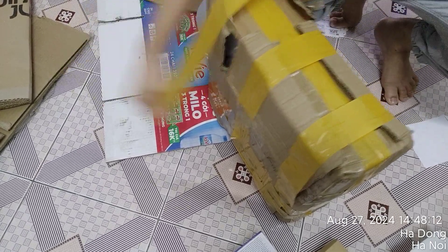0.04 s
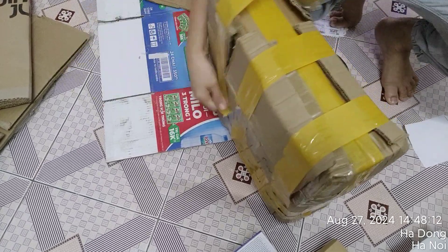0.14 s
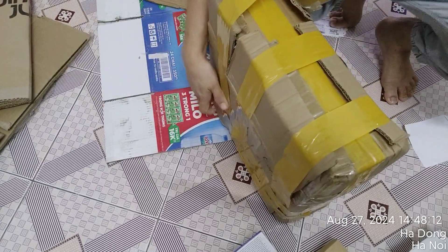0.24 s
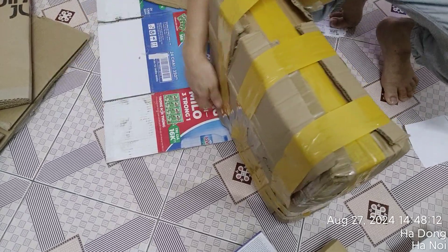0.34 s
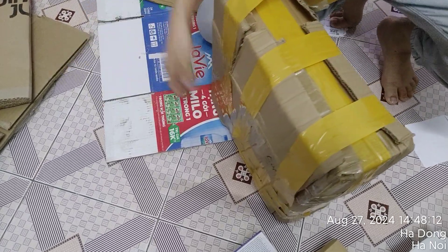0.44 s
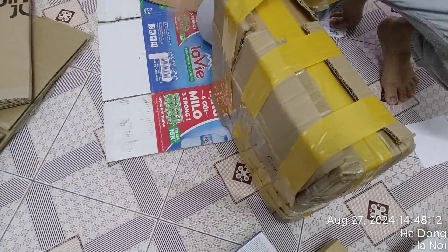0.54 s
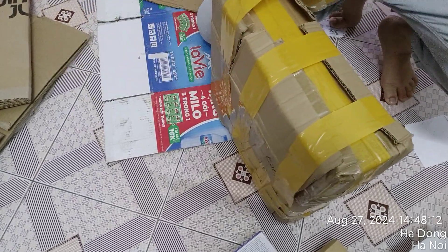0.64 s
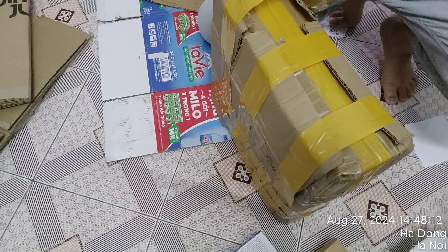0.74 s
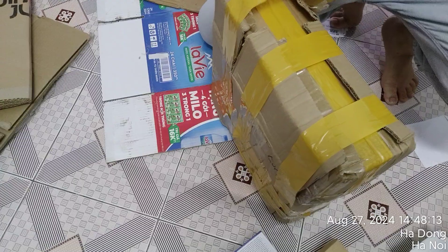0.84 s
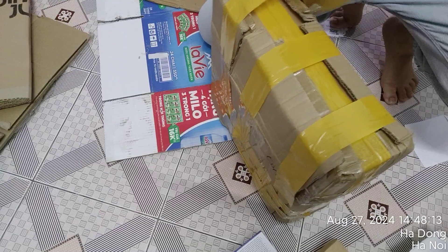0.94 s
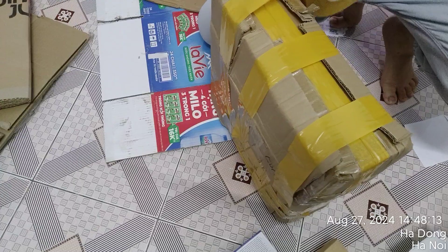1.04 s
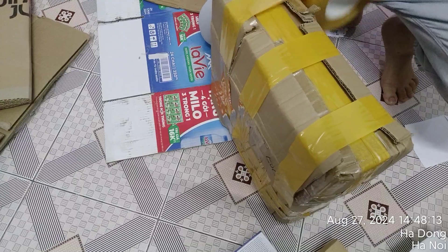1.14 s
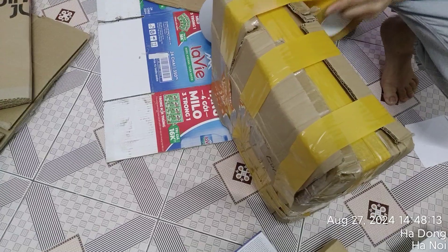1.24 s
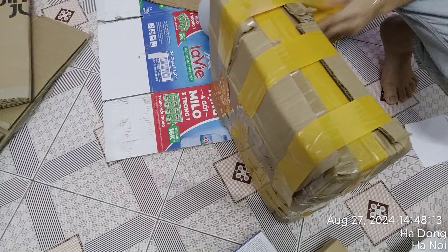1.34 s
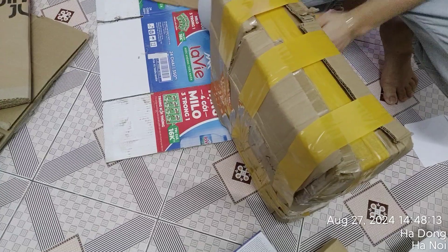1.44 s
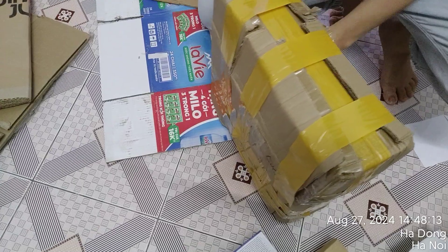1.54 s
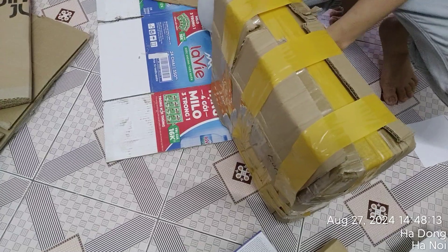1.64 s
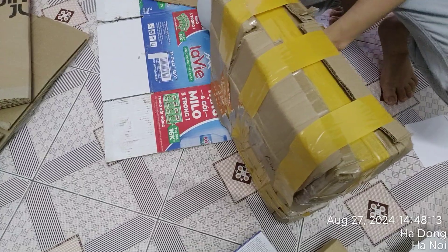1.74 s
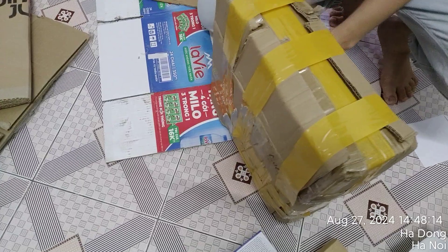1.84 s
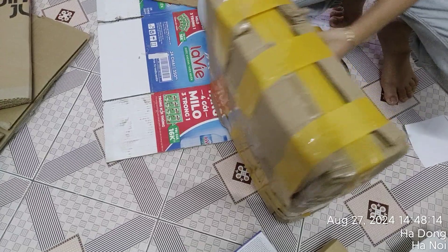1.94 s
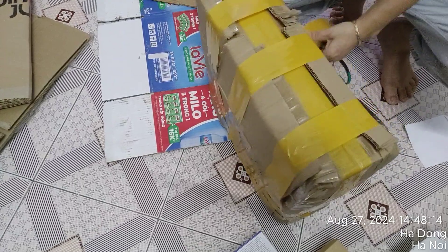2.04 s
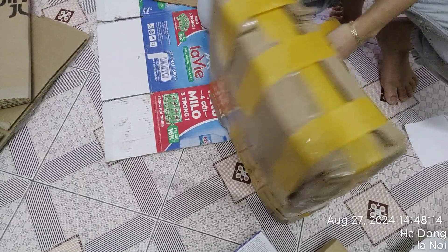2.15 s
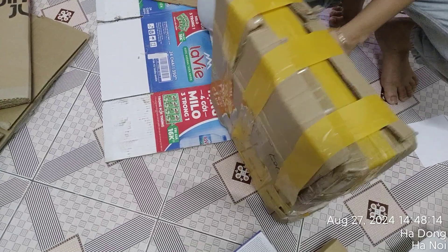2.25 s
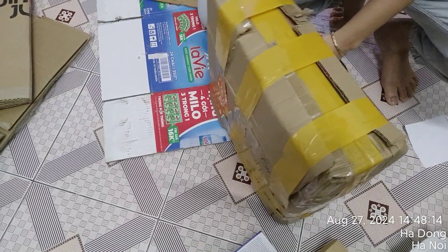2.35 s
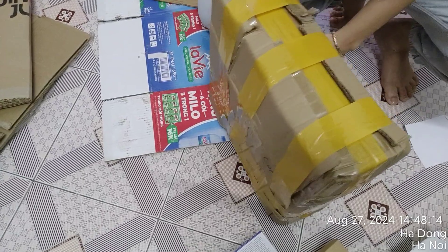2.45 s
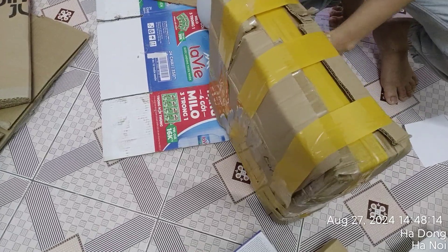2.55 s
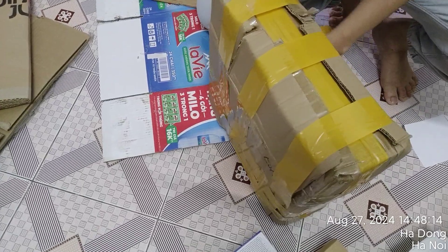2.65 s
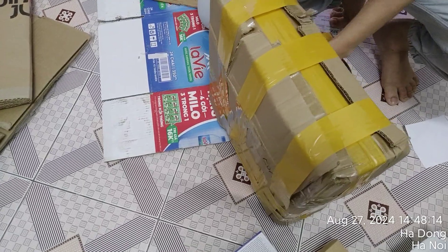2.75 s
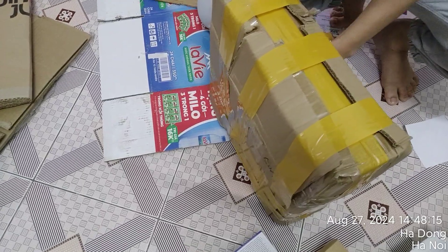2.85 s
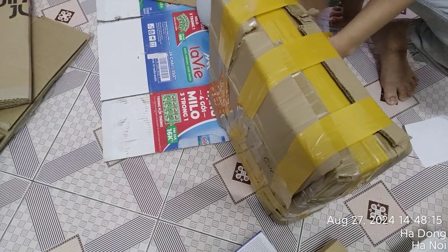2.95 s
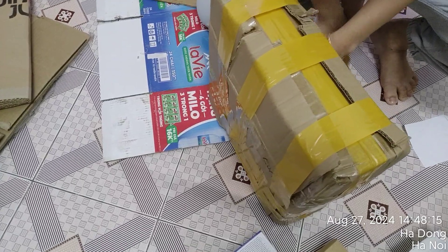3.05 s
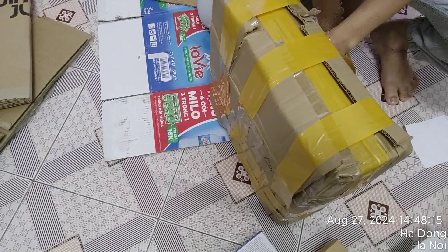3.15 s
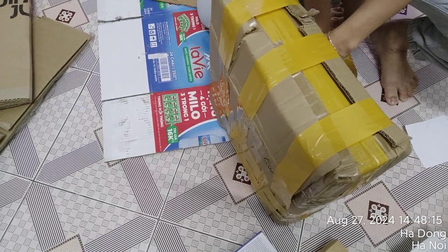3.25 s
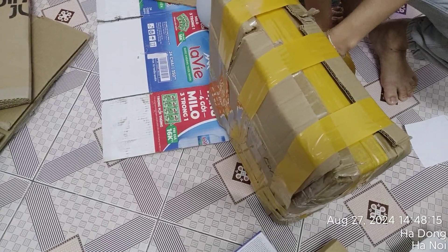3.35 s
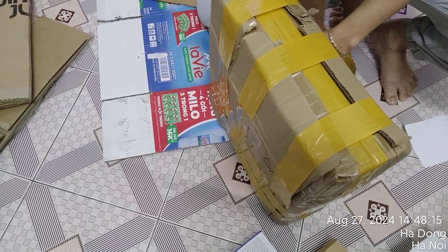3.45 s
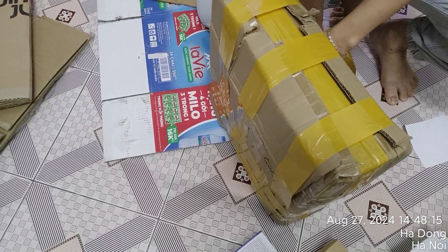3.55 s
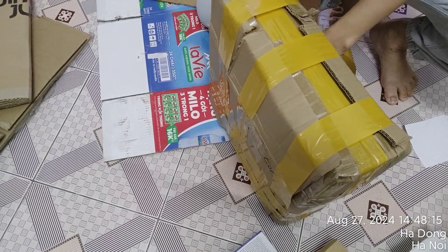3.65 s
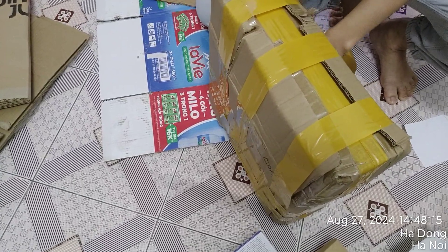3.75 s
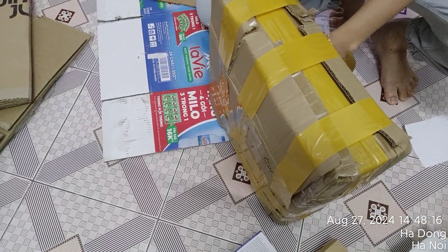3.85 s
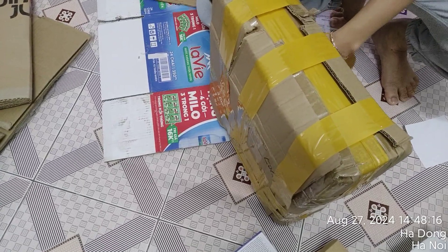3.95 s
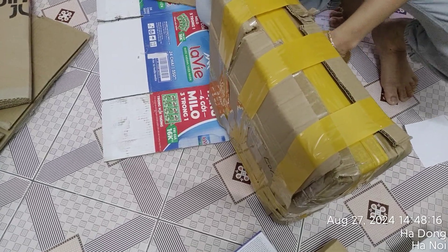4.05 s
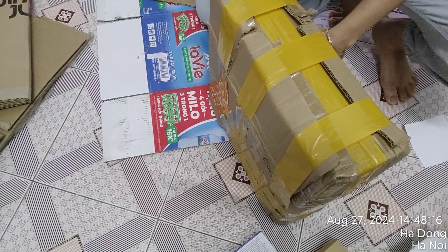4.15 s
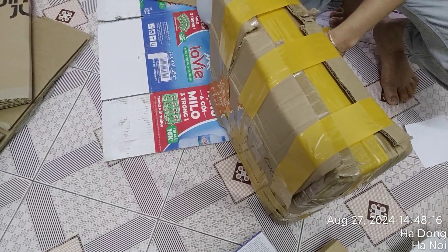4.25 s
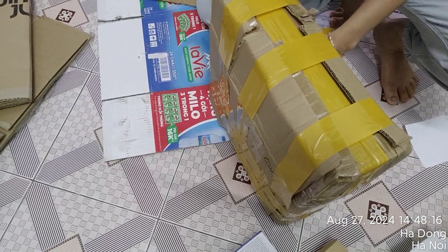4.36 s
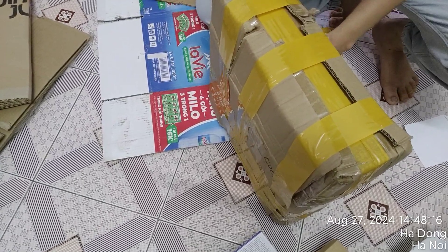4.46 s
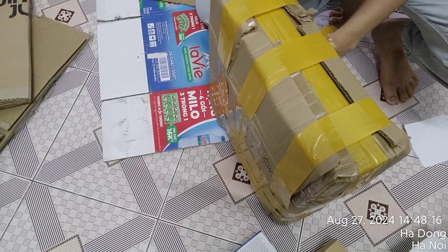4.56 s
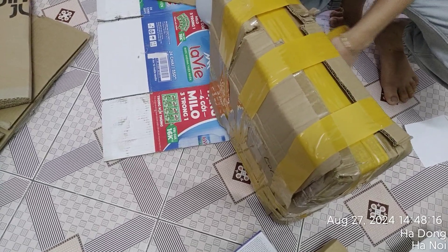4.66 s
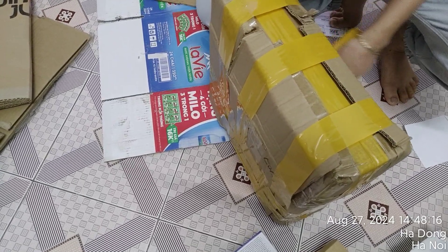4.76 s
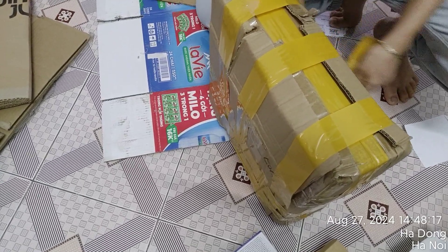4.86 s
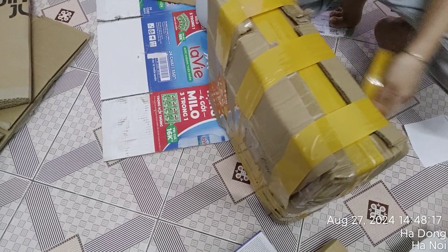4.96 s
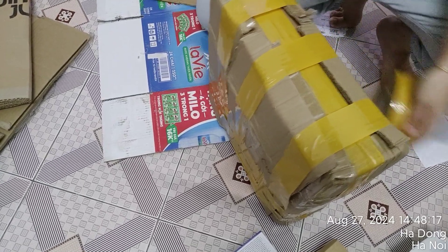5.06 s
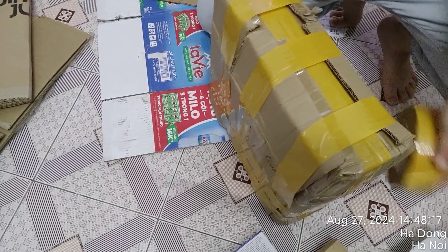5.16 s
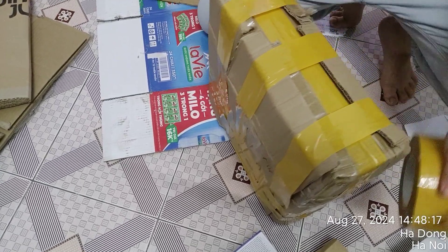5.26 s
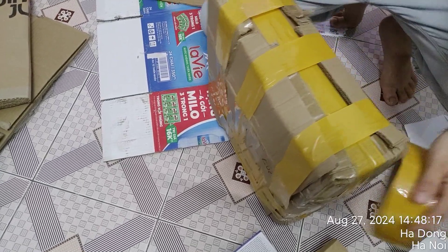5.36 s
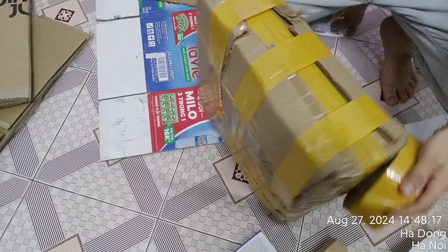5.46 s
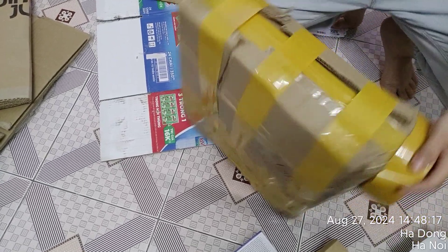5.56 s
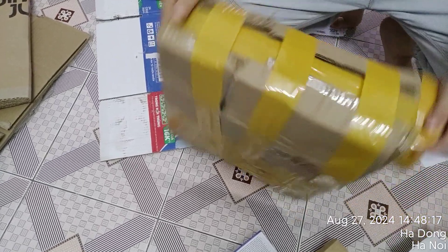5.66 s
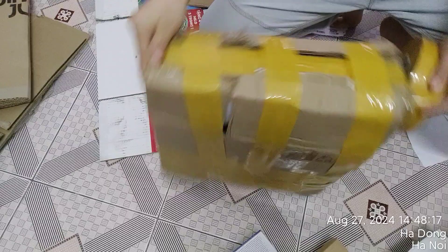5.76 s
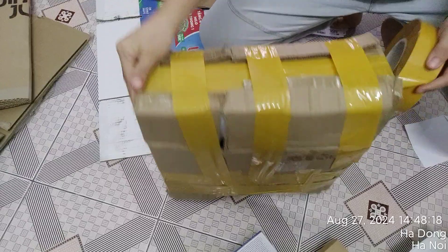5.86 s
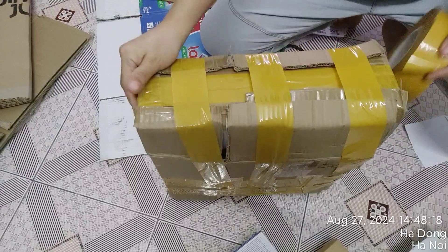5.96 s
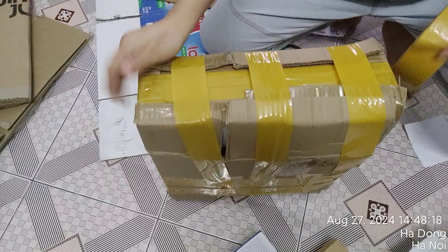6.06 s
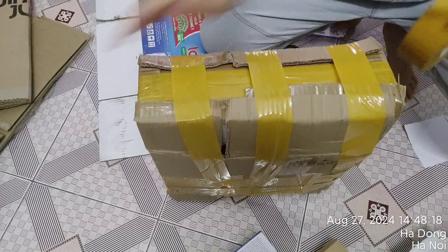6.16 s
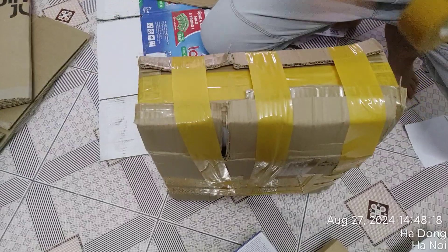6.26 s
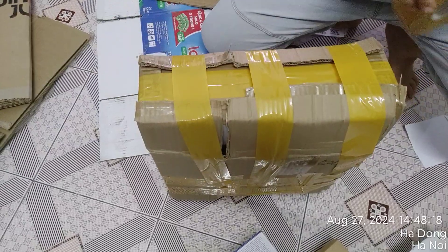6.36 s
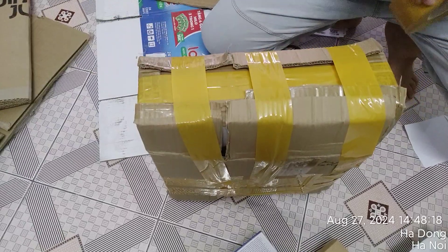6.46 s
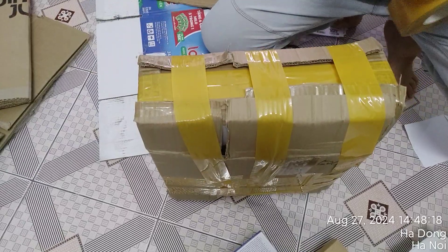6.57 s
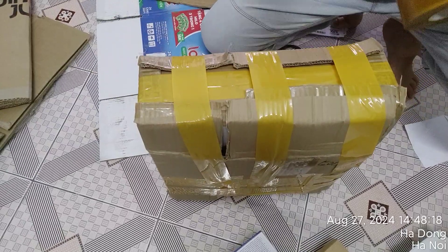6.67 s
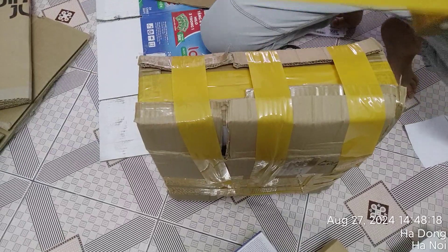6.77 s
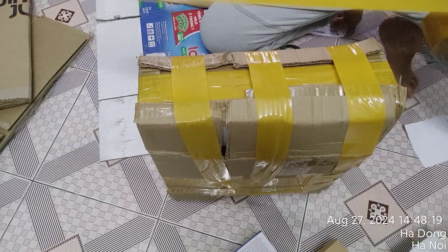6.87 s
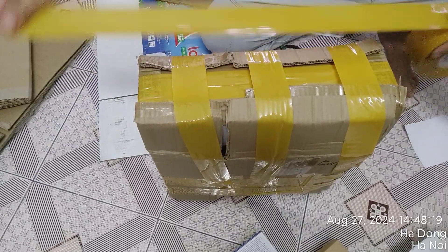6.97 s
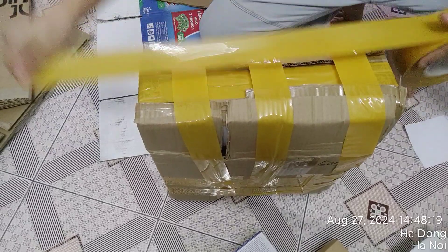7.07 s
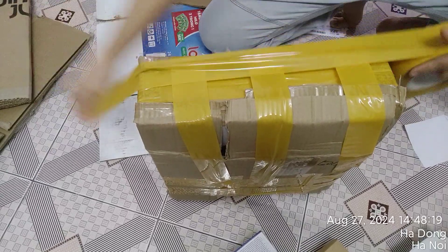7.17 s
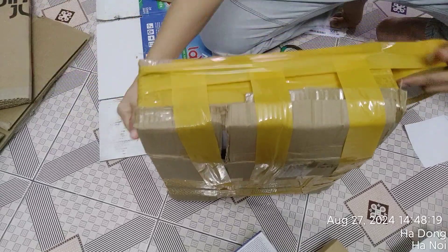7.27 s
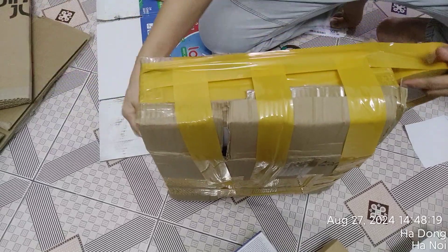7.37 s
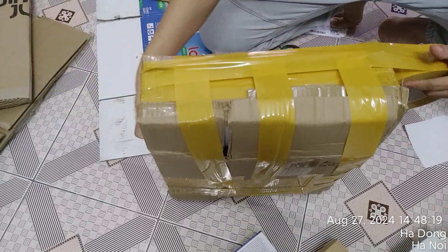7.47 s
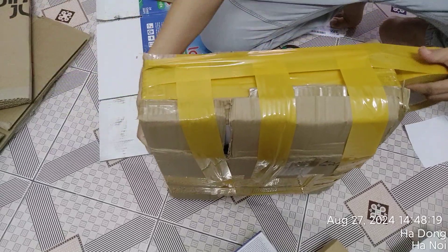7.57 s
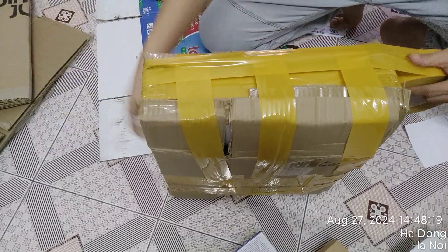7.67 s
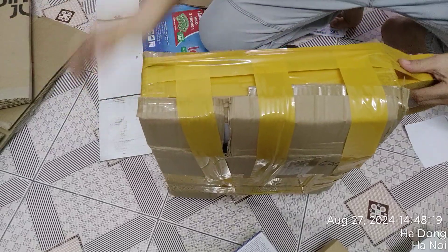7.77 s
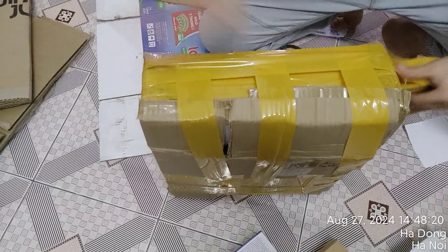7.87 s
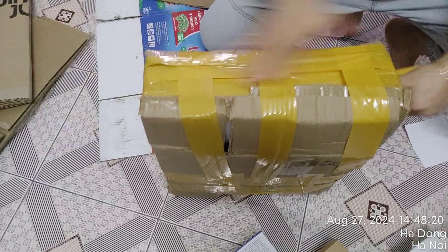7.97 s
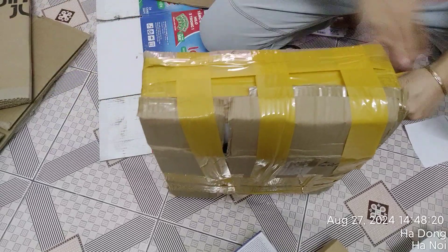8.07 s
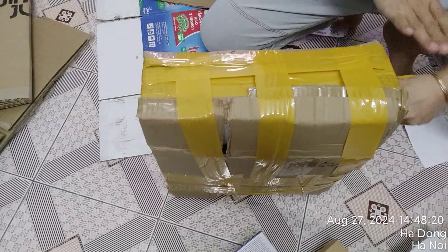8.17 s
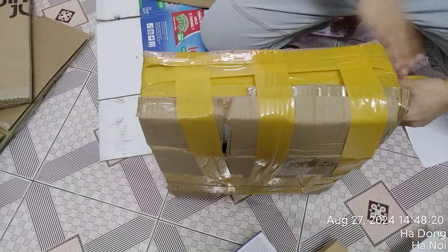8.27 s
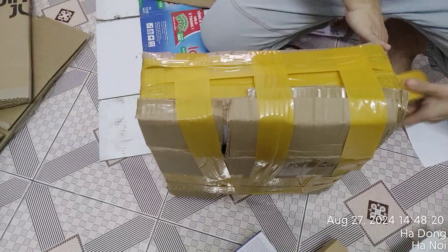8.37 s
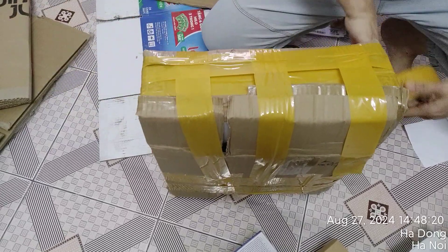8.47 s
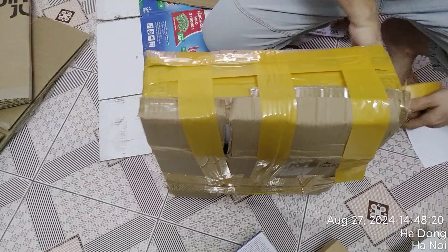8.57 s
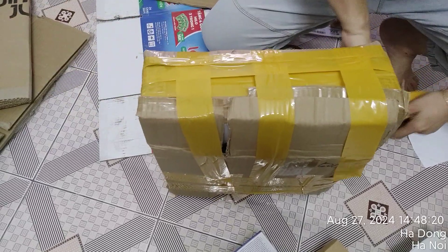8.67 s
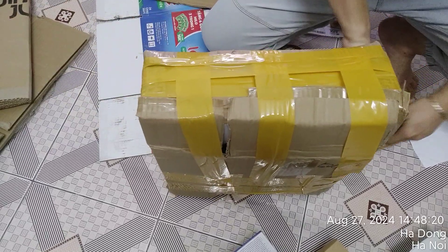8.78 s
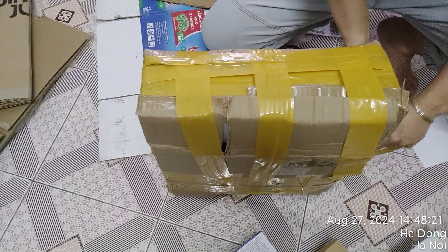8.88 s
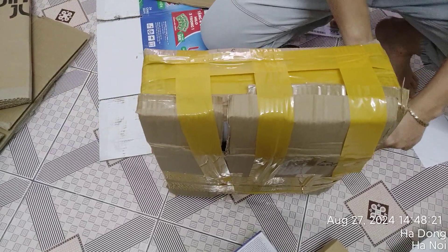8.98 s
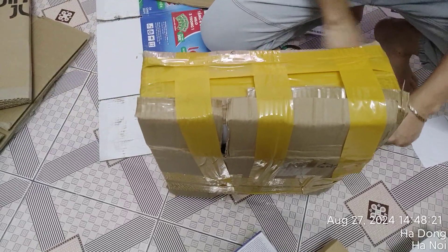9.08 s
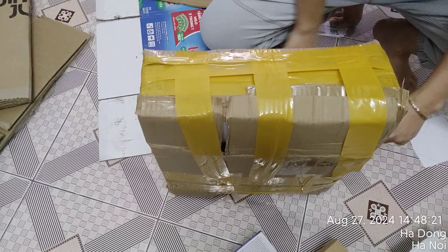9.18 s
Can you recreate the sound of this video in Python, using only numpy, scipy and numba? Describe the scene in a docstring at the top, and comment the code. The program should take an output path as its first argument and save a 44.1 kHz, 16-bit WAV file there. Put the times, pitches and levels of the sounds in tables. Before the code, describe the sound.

Sticky tape lets go in bright, dry cracks and rough buzzing rips, with a ringing taut strip and hollow cardboard drumming. Isolated snaps thin out midway, low muffled thumps mark the box being shifted, then one strong pull and a final flurry of snaps. Phone stereo, near, slightly left, short hard-room echoes, quiet fan behind.

```python
"""Packing tape peeled onto a parcel

Tape is peeled off its roll and pressed onto a cardboard parcel on a tiled floor, under a hand-held phone.
Glue lets go in stick-slip bursts: lone snaps or a buzzing roar. Pulsed noise crackles in the film, rings the
free span and drums the parcel through resonators. Film rustles as hiss and pops; filtered noise makes the
soft bumps, rumble and fan air, a sine the fan hum. Short stereo noise echoes answer from a small hard room."""
import sys
import numpy as np
from scipy import signal
from scipy.fft import rfft, irfft, next_fast_len
from scipy.io import wavfile
from scipy.ndimage import uniform_filter1d
from numba import njit

SR = 44100
rng = np.random.default_rng(int(sys.argv[2]) if len(sys.argv) > 2 else 0)


def master(y):
    """Save y as 16-bit WAV."""
    cut = np.clip(np.atleast_2d(y).T, -1, 1)
    pcm = np.round(cut * 32767)  # scale
    wavfile.write(sys.argv[1], SR, pcm.astype(np.int16))


N = 407043


def undb(db):
    """Decibels to amplitude gain."""
    return 10 ** (np.asarray(db) / 20)


def unit(x):
    """Scale to rms 1."""
    return x / np.sqrt(np.mean(x ** 2))


def colour(x, points):
    """Shape the spectrum by (hz, gain_db) points, interpolated in log frequency, along the last axis."""
    size = next_fast_len(x.shape[-1])
    hz, gain_db = np.transpose(points)
    log_bins = np.log(np.arange(size // 2 + 1) * SR / size + 1)
    gain = undb(np.interp(log_bins, np.log(hz), gain_db))
    return irfft(rfft(x, size) * gain, size)[..., :x.shape[-1]]


def walk(rate_hz):
    """Random levels, a new target every 1 / rate_hz s, slewed linearly; spread near 1."""
    k = int(SR / rate_hz)
    steps = np.repeat(rng.standard_normal(N // k + 1), k)
    return 1.2 * uniform_filter1d(steps, k)[:N]


def hump(peak_s, peak_db, rise_db_per_s, hold_s, fall_db_per_s):
    """Gain that climbs to peak_db at peak_s, holds, then sinks, in straight dB slopes."""
    t = np.arange(N) / SR - peak_s
    rise = np.minimum(t, 0) * rise_db_per_s
    fall = np.maximum(t - hold_s, 0) * fall_db_per_s
    return undb(peak_db + rise - fall)


@njit
def ring(x, hz, q):
    """State-variable band-pass with a moving centre, gain 1 there."""
    y, band, low = np.empty(len(x)), 0., 0.
    for i in range(len(x)):
        g = np.tan(np.pi * hz[i] / SR)
        v = (band + g * (x[i] - low)) / (1 + g * (g + 1 / q))
        band, low, y[i] = 2 * v - band, low + 2 * g * v, v / q
    return y


def fixed_ring(x, hz, q):
    """Band-pass with a constant centre."""
    return ring(x, np.full(len(x), 1. * hz), 1. * q)


# fan air spectrum: hz, shape_db (relative)
AIR_SPECTRUM = [(15, -69), (25, -2), (65, -29.5), (163, -19.5), (202, -5.5), (367, -9.5), (536, -2.5),
                (948, -11), (1060, -9.5), (1970, -19), (2140, -18.5), (3040, -22.5), (16400, -47.5)]
AIR_RMS_DB = -49


def fan_air():
    """Broadband flow noise, partly alike at both ports in the low mids, unrelated above."""
    common, apart = rng.standard_normal(N), rng.standard_normal((2, N))
    low = signal.butter(2, 900, fs=SR, output="sos")
    air = signal.sosfilt(low, common + .5 * apart) + apart - signal.sosfilt(low, apart)
    return undb(AIR_RMS_DB + 0.11 * walk(1.5)) * unit(colour(air, AIR_SPECTRUM))


FAN_HZ, FAN_DB = 60.6, -62  # mean level before the port gains


def fan_hum():
    """Sine with a wavering level, in phase at both ports."""
    level = undb(FAN_DB + 1.5 * walk(12))
    port_gain = [[1.4], [1.1]]
    return level * np.sin(2 * np.pi * FAN_HZ * np.arange(N) / SR) * port_gain


# parcel and knees shifting: peak_s, level_db (before flutter and port gain)
RUMBLES = [(0.0, -56), (1.0, -55), (1.54, -63), (1.75, -47), (1.98, -66.5), (2.23, -43.5), (2.55, -54),
           (4.7, -51), (5.1, -59), (5.42, -48), (5.76, -45.5), (6.1, -55.5), (6.6, -62), (8.07, -64)]
RUMBLE_RISE_DB_PER_S, RUMBLE_FALL_DB_PER_S, RUMBLE_REST_DB = 79, 86, -64


def rumble():
    """Handling and shifting weight: fluttering low noise, unrelated at the two ports."""
    shifts = sum(hump(s, db, RUMBLE_RISE_DB_PER_S, 0, RUMBLE_FALL_DB_PER_S) for s, db in RUMBLES)
    thuds = unit(colour(rng.standard_normal((2, N)),
                        [(12, -24.0), (30, 11.5), (70, 5.5), (150, 6.0), (320, -37.5)]))
    flutter = undb(3 * walk(14))
    return thuds * flutter * (shifts + undb(RUMBLE_REST_DB)) * undb([[0], [-3.5]])


# dull crackle follows the span: stronger when it sounds, weaker when it is short and rings high
DULL_PER_SPAN_DB, DULL_DB_PER_OCTAVE = 0.45, -5


def dullness(span_db, span_hz):
    """Level in dB of the dull crackle that goes with a given span."""
    return DULL_PER_SPAN_DB * span_db + DULL_DB_PER_OCTAVE * np.log2(span_hz / 1500)


# continuous peeling, per rip: (slips_per_s (mean), drum_hz (settled), dull_db (rel. film)), then its course:
# time_s, film_db, span_db (rel. film), span_hz (before wander), drum_db (rel. film)
PEEL_RUNS = [ ((325, 345, 0), [(0.0, -18.5, -6, 1580, -1), (0.09, -54.5, -8, 2100, -16)]), ((64, 530, 1),
             [(1.54, -24, -17, 1890, -19), (1.596, -28, -1.5, 1750, -19), (1.662, -24, -3, 1730, -12),
             (1.74, -28.5, -9.5, 2110, -36)]), ((136, 330, 0), [(2.07, -48.5, 13, 1500, -11),
             (2.094, -27.5, 4.5, 1410, -1.5), (2.156, -34, 2, 1670, -1.5), (2.248, -39.5, -1.5, 1300, 12.5),
             (2.356, -38.5, 10, 2840, -27), (2.44, -34, -9, 1760, -10), (2.56, -42.5, -12, 1760, 5)]),
             ((102, 370, 0.76), [(2.57, -37, -5, 1560, -7), (2.602, -33.5, 9, 1550, -2),
             (2.696, -39.5, 9, 1150, 5.5), (2.834, -70.5, -4, 1390, 20.5)]), ((68, 530, -2.9),
             [(2.845, -37.5, -14, 1750, -14), (2.97, -45, -4, 1880, -8)]), ((60, 280, -0.5),
             [(4.91, -29.5, -19, 1590, -26), (4.946, -15.5, -32, 2170, -27.5), (5.036, -33, -25, 1740, -8),
             (5.08, -35, -7, 1540, -15)]), ((105, 370, -2.2), [(6.645, -26, -11, 1050, -42),
             (6.693, -19.5, -2, 1030, -32), (6.749, -20.5, 3, 1125, -9), (6.857, -22.5, -2, 1140, -6.5),
             (6.949, -19, -9.5, 1160, -11.5), (7.05, -31, -0.5, 1120, -4)]), ((164, 390, -2.5),
             [(8.02, -42, 14, 1600, -3), (8.048, -25.5, 3.5, 1610, -3.5), (8.116, -18, -0.5, 1820, -37),
             (8.17, -37, 2, 2000, -19)]), ((61, 500, 3.5), [(8.29, -52.5, 2.5, 1700, -26),
             (8.406, -35, -1, 1690, -10.5), (8.488, -60, -15, 2150, -1), (8.558, -37, 4, 1720, 4),
             (8.58, -48, -7, 1890, -7)]), ((64, 380, -3), [(8.598, -29, -9, 1820, -2),
             (8.648, -19.5, -12, 1450, -19), (8.734, -26.5, -5, 1870, -12), (8.868, -39, 2.5, 1770, 4),
             (8.964, -37, 1, 2320, -10), (9.06, -44, -3, 2370, -4)]), ]
DRUM_START, DRUM_SAG_S = 1.2, 0.06  # a fresh short strip drums higher by this share, sinking as it lengthens
SLIP_MS = 3.7


def rips():
    """Stick-slip peeling: effort on thin film, dull film, span and parcel, one pulse a slip; ring pitches."""
    t = np.arange(N) / SR
    drive = np.zeros((4, N))
    hz = np.ones((2, N)) * [[1500.], [400.]]  # span, drum
    uneven = 1 + 0.09 * walk(50)
    for (slips_per_s, drum_hz, dull_db), course in PEEL_RUNS:
        time_s, *columns = np.transpose(course)
        on = slice(int(time_s[0] * SR), int(time_s[-1] * SR))
        film_db, span_db, span_hz, drum_db = (np.interp(t[on], time_s, c) for c in columns)
        hz[0, on] = span_hz
        hz[1, on] = drum_hz * (1 + DRUM_START * np.exp(-(t[on] - time_s[0]) / DRUM_SAG_S))
        cycles = np.cumsum(slips_per_s * uneven[on] / SR)
        size = undb(2.0 * rng.standard_normal(300))[cycles.astype(int)]
        # swells quickly, then decays; fast slips merge, and some threads break in between
        age = cycles % 1 / slips_per_s / (SLIP_MS / 1000)
        slips = 0.044 + size * age * np.exp(-age)
        dull_film_db = film_db + dull_db + dullness(span_db, span_hz)
        levels_db = [film_db, dull_film_db, film_db + span_db, film_db + drum_db]
        drive[:, on] = undb(levels_db) * unit(slips)
    return drive, hz


# lone snaps: start_s, film_db (pulse scale), span_db (rel. film), span_hz (before wander), drum_db (rel. film)
LONE_SNAPS = [(0.2308, -30, 5.5, 872, 6), (0.2566, -16.5, -12.5, 1230, -16),
              (0.2832, -19.5, -15, 1620, -20), (0.541, -45, -10, 2500, -25), (0.796, -42, -10, 2000, -25),
              (1.009, -34, -2.5, 2730, -12), (1.0646, -20.5, -8, 1570, -34), (1.0896, -23, -3, 1610, -25),
              (1.1639, -4, -12.5, 1540, -23.5), (1.1904, -8, -10, 2600, -27), (1.2553, -4, -7, 2160, -20.5),
              (1.281, -6.5, -14, 1550, -25), (1.32, -3, -18.5, 1270, -16), (1.3504, -6, -3.5, 1300, -19),
              (1.4033, -9, -3, 1250, -10.5), (1.4464, -7.5, -0.5, 1310, -17),
              (1.4705, -6.5, -23, 1280, -31), (1.54, -11.5, -9, 2950, -15), (1.568, -8.5, -6, 1830, -30),
              (1.582, -10, -4, 1830, -28), (1.704, -13.5, -8.5, 1760, -49), (2.0171, -24, 2.5, 1180, -14),
              (2.075, -25, -3, 1210, -17), (2.188, -24, 1, 1190, -12), (2.216, -19, 2.5, 1210, -14),
              (2.2347, -18, 3, 1230, -3), (2.308, -13.5, -2, 1920, -11.5), (2.3339, -21.5, 8, 2550, -14.5),
              (2.4004, -27, 3, 3760, -34), (2.4153, -22, 3.5, 1340, -4), (2.851, -25, -30, 1740, -22),
              (2.8933, -22.5, -17, 1470, -33), (3.271, -13.5, -32, 1020, -32),
              (3.3458, 1.5, -26.5, 2580, -28.5), (3.7014, -1.5, -22.5, 2000, -45.5),
              (3.903, -11, -28.5, 2330, -38), (4.2206, -48, 14, 1120, 3), (4.397, -22, -12, 1910, -14.5),
              (4.584, -11, -21, 2440, -35), (4.6715, -24, -22, 1080, -15.5), (4.7551, -26.5, -5, 1850, -23),
              (4.8352, -24.5, -12.5, 2460, -29), (4.888, -19.5, -17, 2400, -29.5),
              (4.9091, -8.5, -23, 1190, -36), (5.0103, -7.5, -47, 2590, -21),
              (5.5245, -39.5, 11, 1060, -2.5), (5.954, -31, -9, 1600, -12.5), (6.6388, -18, -18, 1980, -46),
              (7.3474, -31, -9, 1100, -4), (7.53, -37, -2, 920, -11), (7.5969, -41.5, 9, 1340, -12),
              (7.897, -7, -10, 2140, -30), (8.001, -5.5, -10.5, 1630, -38), (8.0236, -6.5, -9, 1560, -20.5),
              (8.0478, -9, -6, 1520, -35), (8.2051, -17, -2.5, 2030, -40), (8.3097, -24, -22, 1040, -37),
              (8.361, -26, -20, 1650, -33), (8.414, -12, -13, 1560, -41), (8.4634, -12.5, -8, 2110, -23),
              (8.524, -22, -1, 2020, -22), (8.545, -12, -16, 1590, -21), (8.5994, -14.5, -4, 1530, -21.5),
              (8.6167, -22, 4.5, 2480, -17), (8.6342, -10, -10.5, 1090, -20),
              (8.6655, -8, -9.5, 1050, -22.5), (8.6807, -13.5, -4, 2460, -16), (8.71, -11, -7, 1510, -16),
              (8.735, -15, -3, 1610, -12), (8.7514, -17, -9, 2130, -12), (8.769, -12, -1.5, 1970, -15),
              (8.8464, -22, 7, 1820, -11), (8.8595, -24.5, -7, 1970, -9), (8.9002, -31.5, 11.5, 1970, -25),
              (8.9227, -25, 5, 2110, -17), (8.941, -25, -4, 2300, -21), (8.972, -23, 1, 2300, -12),
              (9.058, -13.5, -11.5, 2320, -30), (9.0958, -18.5, -5.5, 2790, -20)]
SNAP_DECAY_MS, SNAP_DECAY_SPREAD = 2.08, 0.35  # median over still glue; log spread
SNAP_DRUM_HZ, SNAP_DRUM_SPREAD = 371, .15  # median; log spread
SNAP_DULL_DB = -1.5  # rel. film, before dullness
SPAN_PUSH_DB, DRUM_PUSH_DB = 6.26, 11.85  # a short burst feeds narrow, low rings less


def snaps(hz, running):
    """Single slips that swell and die within a few ms; each brings its own ring pitches."""
    drive, hz = np.zeros((4, N)), hz.copy()
    chances = rng.standard_normal((len(LONE_SNAPS), 2))
    for (start_s, film_db, span_db, span_hz, drum_db), (decay_chance, drum_chance) in zip(LONE_SNAPS, chances):
        a = int(start_s * SR)
        # glue that is already moving lets go less abruptly
        slow = 1.7 if running[a - 200] else 1
        decay_s = slow * SNAP_DECAY_MS * np.exp(SNAP_DECAY_SPREAD * decay_chance) / 1000
        age = np.arange(min(2000, N - a)) / (decay_s * SR)
        pulse = (1 - np.exp(-2.5 * age / slow)) * np.exp(-age)
        dull_db = SNAP_DULL_DB + dullness(span_db, span_hz)
        relative_db = np.array([[0], [dull_db], [span_db + SPAN_PUSH_DB], [drum_db + DRUM_PUSH_DB]])
        drive[:, a:a + 2000] += undb(film_db + relative_db) * pulse
        hz[0, a:a + 600] = span_hz
        hz[1, a:a + 2000] = SNAP_DRUM_HZ * np.exp(SNAP_DRUM_SPREAD * drum_chance)
    return drive, hz


# fingers and film rustling: peak_s, level_db (before pops and flutter), swell_s, hold_s
RUSTLES = [(0.882, -65, .02, .02), (1.024, -58.5, 0.11, 0.12), (1.77, -46.5, .02, 0.23),
           (3.34, -41, .004, 0.0034), (4.25, -61, 0.48, 0.33), (4.582, -49, .01, 0.046),
           (5.2, -67.5, .05, .01), (5.522, -70, 0.046, .01), (5.927, -55, 0.55, 0.0086),
           (6.59, -49.5, 0.093, .04), (7.363, -53, 0.11, 0.0087), (7.528, -58, 0.011, 0.04),
           (7.874, -53, .03, 0.0092)]
RUSTLE_SWELL_DB, RUSTLE_FALL_DB_PER_S = 25.5, 127
POPS_PER_S, POP_DECAY_MS, POP_DB = 35, 1.4, 12  # POP_DB: mean pop peak over the hiss


def rustle():
    """Crinkling film: swelling hiss with creases popping; effort on thin film, dull film and slack span."""
    hiss = sum(hump(s, db, RUSTLE_SWELL_DB / swell_s, hold_s, RUSTLE_FALL_DB_PER_S)
               for s, db, swell_s, hold_s in RUSTLES)
    pops = (rng.random(N) < POPS_PER_S / SR) * rng.exponential(size=N)
    pops = signal.lfilter([1], [1, -np.exp(-1000 / (POP_DECAY_MS * SR))], pops)
    effort = hiss * (1 + undb(POP_DB) * pops)
    # mostly film; the slack span joins in only faintly
    slack_span = undb(-4.0) * np.minimum(effort, undb(-45.0))
    return np.array([effort, undb(-3.0) * effort, slack_span]) * undb(3.0 * walk(25))


def crackle(spread_db):
    """Glue threads breaking: four noises whose 12-sample grains share long-tailed sizes."""
    size = np.minimum(rng.exponential(size=N // 12 + 1), 3)
    grain_gain = np.repeat(undb(spread_db * size), 12)[:N]
    return unit(rng.standard_normal((4, N)) * grain_gain)


# thin crackle spectrum: hz, shape_db (relative)
FILM_SPECTRUM = [(2500, -28), (4300, -5), (5300, 0.5), (6700, 6.5), (7800, -3), (10000, -7.5),
                 (14300, -22.5), (16400, -66)]
# papery resonances: centre_hz, q, gain_db
PAPERY_RINGS = [(5300, 55, 13), (8400, 35, -0.5), (12500, 2.7, -17)]


def thin_film(drive, span_drive, grains):
    """Treble crackle plus the film's papery ring, clearest when no span is pulled taut."""
    thin = colour(drive * grains, FILM_SPECTRUM) / np.std(colour(grains, FILM_SPECTRUM))
    loose = drive ** 2 / (drive + 3 * span_drive + 1e-9) * grains
    return thin + sum(undb(db) * fixed_ring(loose, hz, q) for hz, q, db in PAPERY_RINGS)


def dull_film(push):
    """Duller crackle: one broad band."""
    return 4.09 * fixed_ring(push, 3500, 1.33)


def free_span(pull, hz):
    """Taut free tape: one clear ring on a broad hump, its pitch wandering."""
    hz = np.clip(hz * (1 + 0.03 * walk(40)), 600, 4000)
    broad = ring(ring(pull, 1.12 * hz, 0.63), 1.06 * hz, 0.55)
    return 3.3 * broad + 6.1 * ring(pull, hz, 9.0)


# cardboard modes: centre_hz, width_hz, level_db (relative)
PARCEL_MODES = [(272, 33, -6), (405, 19, -7.5), (554, 160, -7)]


def drumming(push, strip_hz):
    """Fixed parcel modes, plus the taut strip drumming lower the longer it gets."""
    parcel = 9.1 * sum(undb(db) * fixed_ring(push, hz, hz / width_hz) for hz, width_hz, db in PARCEL_MODES)
    return parcel + 11.04 * ring(push, np.clip(strip_hz, 150, 1200), 2.2)


def tape():
    """Rips, snaps and rustling drive film, span and parcel; the tape sounds carry nothing below about 190 Hz."""
    steady, hz = rips()
    lone, (span_hz, drum_hz) = snaps(hz, steady[0] > 0)
    drive = steady + lone
    drive[:3] += rustle()
    grains = crackle(0.9)
    push = drive * grains
    voices = thin_film(drive[0], drive[2], grains[0]) + dull_film(push[1])
    voices = voices + free_span(push[2], span_hz) + drumming(push[3], drum_hz)
    return signal.sosfilt(signal.butter(4, 190, "high", fs=SR, output="sos"), voices)


EARLY_T60_S, EARLY_DB = 0.018, -5  # EARLY_DB: before the high-pass


def nearby(x):
    """Scatter from floor, parcel and limbs: brief treble echoes, unrelated left and right, new as things move."""
    fade = np.exp(-np.log(1000) * np.arange(1500) / SR / EARLY_T60_S)
    hop = 1024
    out, padded = np.zeros((2, N + 4 * hop)), np.pad(x, (0, 2 * hop))
    for a in range(0, N, hop):
        piece = padded[None, a:a + 2 * hop] * signal.get_window("hann", 2 * hop)
        echo = signal.fftconvolve(piece, rng.standard_normal((2, 1500)) * fade, axes=1)
        out[:, a:a + echo.shape[1]] += echo
    out = signal.sosfilt(signal.butter(1, 600, "high", fs=SR, output="sos"), out[:, :N])
    return undb(EARLY_DB) * out / np.sqrt(np.sum(fade ** 2))


# reverberation bands: centre_hz, t60_s, level_db (relative), alike_share (power common to both ports)
ROOM_BANDS = [(300, 0.5, -10.5, 1), (1015, 0.18, -11.5, 0.92), (2980, 0.44, -6.5, 0.0062),
              (7000, 0.45, -11.5, 0.17), (12400, 0.3, -6, 0.022)]


def room(x):
    """Floor and walls: a noise tail after 150 samples, each band with its own decay."""
    t = np.arange(SR // 2) / SR
    tail = 0
    for hz, t60_s, db, alike in ROOM_BANDS:
        common, left, right = (fixed_ring(v, hz, 0.81) for v in rng.standard_normal((3, len(t))))
        band = np.sqrt(alike) * common + np.sqrt(1 - alike) * np.array([left, right])
        fade = np.exp(-np.log(1000) * t / t60_s)
        tail = tail + undb(db) * band * fade / np.sqrt(np.sum(fade ** 2))
    tail[:, :150] = 0
    return signal.fftconvolve(x[None], tail, axes=1)[:, :N]


# parcel bumping on the floor as it is turned: start_s, level_db (nominal peak), ring_hz
PARCEL_BUMPS = [(5.306, -53, 91), (5.399, -48, 72.7), (5.475, -39.5, 274), (5.654, -42.5, 135),
                (5.714, -39.5, 240), (6.058, -46, 93.6), (6.138, -49, 147)]


def bumps():
    """Soft noise pushes of 1200 samples into a dull low ring."""
    push, hz = np.zeros(N), np.full(N, 150.)
    for start_s, level_db, ring_hz in PARCEL_BUMPS:
        a = int(start_s * SR)
        push[a:a + 1200] += undb(level_db + 23.0) * np.hanning(1200)
        hz[a:a + 3000] = ring_hz
    return ring(push * rng.standard_normal(N), hz, 3.7)


# where the hands work: time_s, left_minus_right_db
HAND_SIDE = [(0.0, 1), (1.88, 1), (2.18, 2.5), (5.27, 2), (5.53, 4), (6.58, 0.5), (9.23, 2)]
PORT_LAG_SAMPLES, LAG_SPREAD_SAMPLES = 6, 3  # right port hears later; wander as hands move


def scene():
    """Direct sound mostly reaches the left port first; echoes, bumps and background join."""
    peel = tape()
    pan_db = np.interp(np.arange(N) / SR, *np.transpose(HAND_SIDE))
    lag = np.round(PORT_LAG_SAMPLES + LAG_SPREAD_SAMPLES * walk(6)).astype(int)
    late = np.clip(np.arange(N) - lag, 0, N - 1)
    direct = np.array([peel, peel[late]])
    side_gain = undb(np.array([pan_db, -pan_db]) / 2)
    parcel_work = (undb(-3.0) * direct + nearby(peel) + room(peel)) * side_gain
    return parcel_work + bumps() + fan_air() + fan_hum() + rumble()


TOP_HZ = 15900


def record(dry):
    """The phone rounds the loudest peaks and cuts the top."""
    return signal.sosfilt(signal.ellip(8, .2, 70, TOP_HZ, fs=SR, output="sos"), np.tanh(dry))


dry = scene()
out = record(dry)
master(out)
```